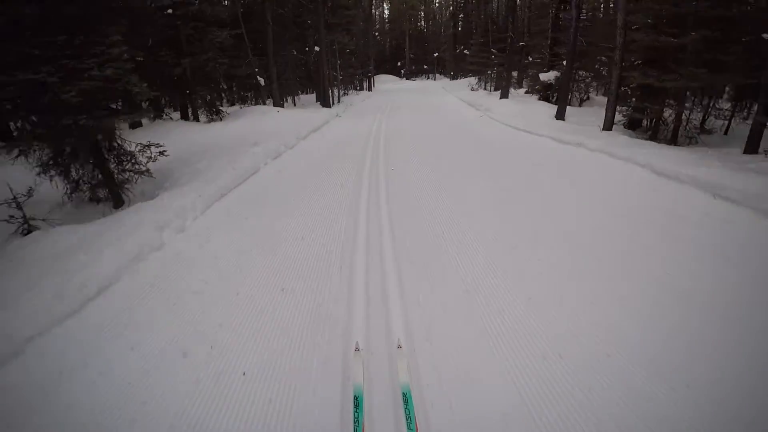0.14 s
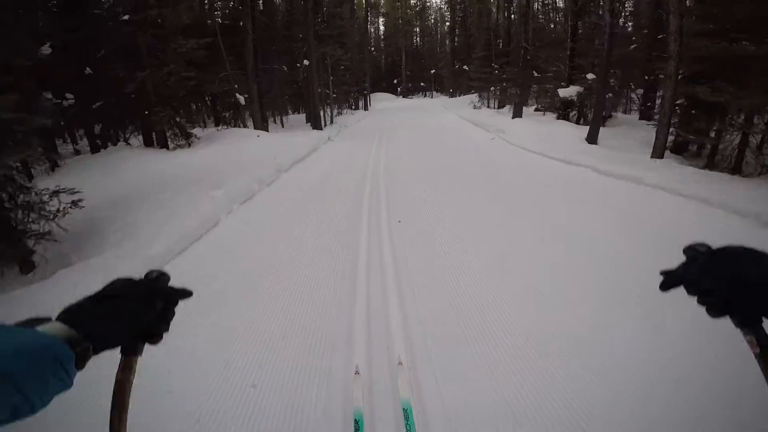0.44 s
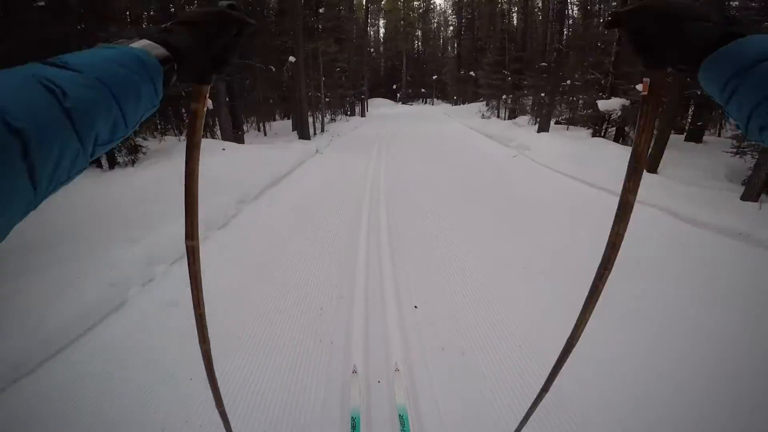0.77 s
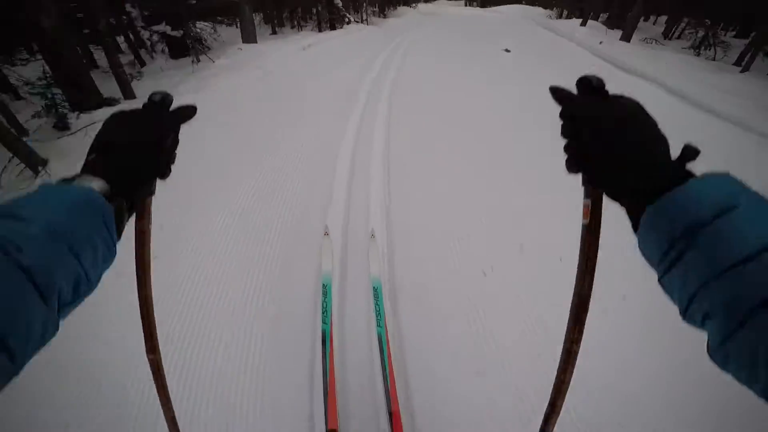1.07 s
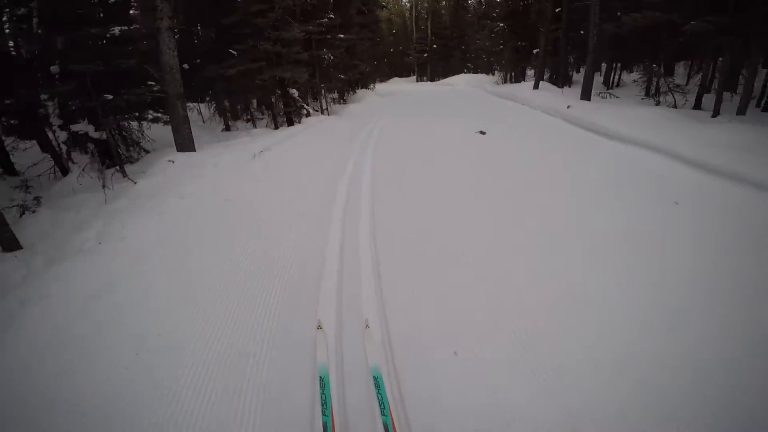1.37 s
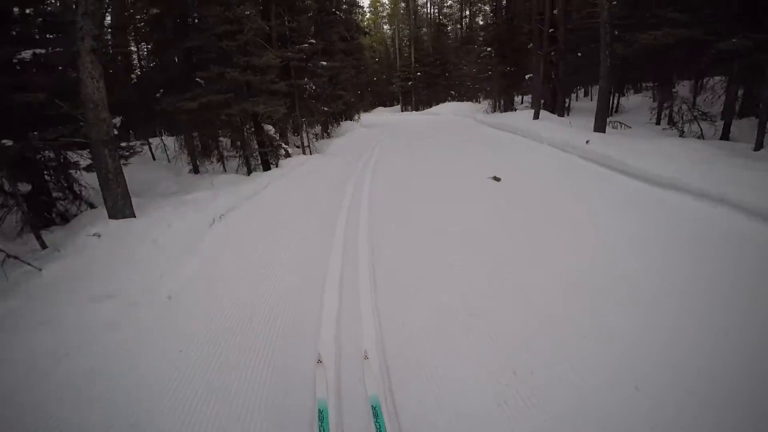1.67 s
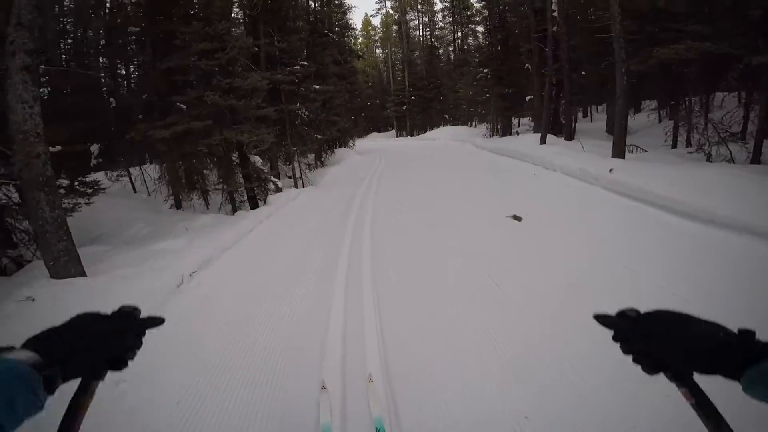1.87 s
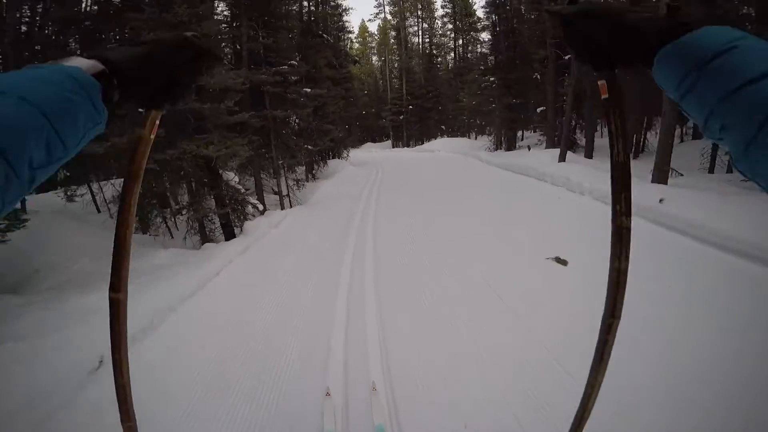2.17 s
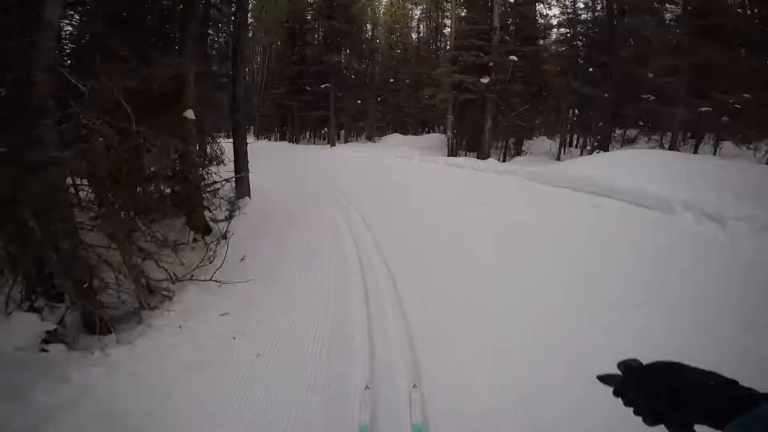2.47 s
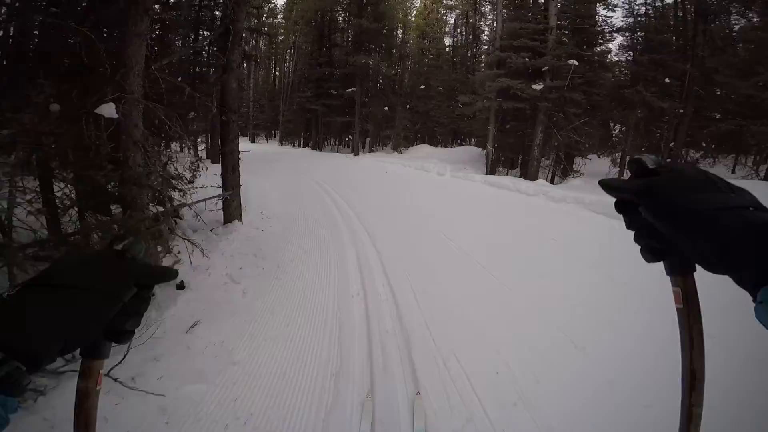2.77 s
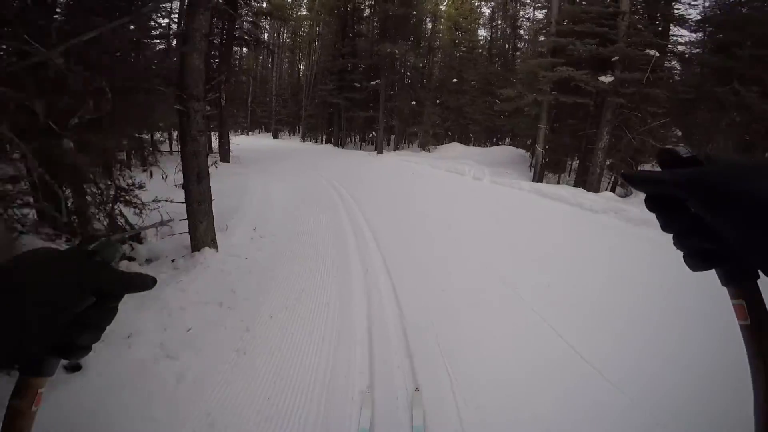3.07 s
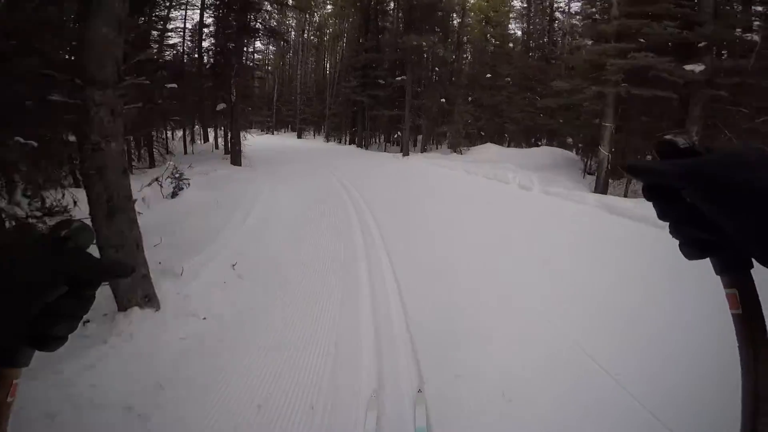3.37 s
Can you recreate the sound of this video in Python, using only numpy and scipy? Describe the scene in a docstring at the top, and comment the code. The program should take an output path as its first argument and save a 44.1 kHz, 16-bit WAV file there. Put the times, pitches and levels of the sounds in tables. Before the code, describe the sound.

Cross-country skis slide with a grainy hiss along a snowy track, under deep, sometimes distorting wind gusts on a chest-worn microphone. Short pole crunches, strap rubbing, knocks and two clicks come through, and the glide is loudest late on.

```python
"""A skier double-poles along a snowy forest track, a small stereo camera strapped to the chest.
From the start the skis hiss over snow grains, the harness rubs the housing and head wind buffets the
two microphone ports, overloading the right. Near 0.85 s a deep swing snaps off; then the poles bite
the crust and the harness knocks. A high sizzle rides the glide from 1.5 to 2.2 s, a second snap comes
near 2.5 s, and after the last bite the ski hiss swells to its loudest around 3 s."""
import sys
import numpy as np
from scipy import signal
from scipy.fft import rfft, irfft
from scipy.io import wavfile
from scipy.ndimage import uniform_filter1d

SR = 44100
rng = np.random.default_rng(int(sys.argv[2]) if len(sys.argv) > 2 else 0)


def transcribe(u):
    """Save the signal u as a 16-bit wav file named by the first command-line argument.

    u: samples, shape (n,) or (channels, n), limited to [-1, 1]; the rate is SR.
    q: integer samples, one column per channel.
    """
    v = np.clip(np.atleast_2d(u).T, -1, 1)
    q = np.round(v * 32767).astype(np.int16)
    wavfile.write(sys.argv[1], SR, q)


N = 155673
WIND_LAG_S = 0.00355  # wind reaches the left port this much later


def from_db(db):
    return 10 ** (np.asarray(db) / 20)


def unit_rms(x):
    return x / np.sqrt(np.mean(x ** 2, axis=-1, keepdims=True) + 1e-20)


def curves(rows, at):
    """One curve per column, interpolated along the first column."""
    axis, *columns = np.transpose(rows)
    return [np.interp(at, axis, column) for column in columns]


def automation(rows):
    """Breakpoints in seconds, drawn out to one value per sample."""
    return curves(rows, np.arange(N) / SR)


def drift(rate_hz):
    """Smooth random wander of unit RMS, rolling off above rate_hz."""
    hop, settle = 40, 2000
    pole = np.exp(-2 * np.pi * hop * rate_hz / SR)
    noise = rng.standard_normal(N // hop + settle + 2)
    slow = signal.lfilter([1], [1, -2 * pole, pole * pole], noise)[settle:]
    return np.interp(np.arange(N) / hop, np.arange(len(slow)), unit_rms(slow))


def ring(x, hz, t60_s):
    """A resonator: each click sets a decaying sine ringing."""
    pole, angle = from_db(-60 / (t60_s * SR)), 2 * np.pi * hz / SR
    return signal.lfilter([0, np.sin(angle)], [1, -2 * pole * np.cos(angle), pole * pole], x + 1e-18)


def band(x, low_hz, high_hz, order=2):
    return signal.sosfilt(signal.butter(order, [low_hz, high_hz], "band", fs=SR, output="sos"), x)


def wind_bed():
    """Head wind on the ports: deep gusts they partly share, plus a lumpy rumble of each port's own."""
    # rumble swells: time_s, left_db, right_db
    rumble_levels = [(0, -49, -50), (.4, -23.5, -16.5), (.9, -31, -23), (1.4, -21, -11), (1.7, -29, -19.5),
                     (2.2, -33, -20.5), (2.5, -21.5, -15), (2.7, -15.5, -48), (2.95, -18, -15.5),
                     (3.1, -20.5, -23), (3.35, -18, -24), (3.53, -21, -16)]
    likeness = 0.21
    noise = rng.standard_normal((4, N + SR))  # the spare second lets the filters settle
    right, left_own = unit_rms(band(noise[:2], 31.3, 49.3, order=1)[:, SR:])
    left = likeness * np.roll(right, int(WIND_LAG_S * SR)) + np.sqrt(1 - likeness ** 2) * left_own
    gusts = from_db(3.93 * drift(1.5)) * [from_db(-27) * left, from_db(-18) * right]
    rumble = [from_db(level_db - drift(13)) * unit_rms(band(port, 54, 145, order=1)[SR:])
              for port, level_db in zip(noise[2:], automation(rumble_levels))]
    return gusts + signal.sosfilt(signal.butter(2, 260, fs=SR, output="sos"), rumble)


def wind_buffets():
    """Each buffet is a few deep pressure swings sliding in pitch, later and mostly weaker on the left."""
    # wind hits: centre_s, length_s, right_db, left_db, swing_hz
    wind_hits = [(0.09, 0.11, -3, -14, 42.3), (0.466, 0.12, -1.5, -16, 39.5), (0.994, 0.025, 0.5, -16, 43),
                 (1.045, 0.068, -2, -6, 30.6), (1.161, 0.11, -2, -17, 34), (1.412, 0.063, -1.5, -20, 70),
                 (1.735, 0.1, -0.5, -13, 44), (2.102, 0.099, -5, -20, 41.6), (2.369, 0.049, 0.5, -23, 47.6),
                 (2.423, 0.073, -0.5, -11, 30.2), (2.506, 0.069, 1.5, -24, 40.2),
                 (2.63, 0.18, -33, -13.5, 33.7), (2.859, 0.051, 2, -7, 35.6), (2.929, 0.055, -4, -5.5, 40),
                 (3.249, 0.069, 0.5, -11, 40.7)]
    out, t = np.zeros((2, N)), np.arange(N) / SR
    for centre_s, length_s, right_db, left_db, swing_hz in wind_hits:
        phase, slide = rng.uniform(-0.76, 1, 2)
        span = slice(max(int((centre_s - length_s) * SR), 0), int((centre_s + length_s) * SR))
        offset_s = t[span] - centre_s - [[WIND_LAG_S], [0]]
        swell = np.exp(-(2.68 * offset_s / length_s) ** 2)
        cycles = swing_hz * offset_s * (1 + 7.3 * slide * offset_s)
        swing = np.cos(2 * np.pi * cycles + np.pi * phase + [[-1.1], [0]])
        out[:, span] += from_db([[left_db], [right_db]]) * swell * swing
    ragged_db = 1.8 * np.array([drift(15), drift(32)])
    return out * from_db(1 + ragged_db)


def harness_on_housing():
    """Lumpy harness friction and bouncing knocks ring the same modes of the camera housing."""
    # harness rub: time_s, level_db, upper_modes_db
    rub_levels = [(0, -32.5, -9), (.3, -21, -17.5), (.47, -27, -33), (.52, -15.5, -13.5), (.66, -13, -2),
                  (.79, -10.5, -11), (.84, -27, -1.5), (1.05, -18.5, -8.5), (1.18, -11.5, -9),
                  (1.4, -13.5, -9), (1.46, -27, -8), (1.68, -24, -20.5), (1.95, -18.5, -16),
                  (2.02, -16, -10), (2.19, -10.5, -18.5), (2.26, -42, -12), (2.36, -12.5, -6.5),
                  (2.45, -16.5, -7.5), (2.55, -73, -5), (3.53, -47, -1.5)]
    # housing modes: pitch_hz, t60_s, left_db, right_db, left_sign, knock_share_db
    housing_modes = [(73.1, 0.37, -22, -3, -1, 5), (120.8, 0.35, -9.5, 1, -1, 2.5),
                     (138.7, 0.3, -11.5, 1.5, -1, -9), (319, 0.086, -19.5, -7.5, 1, 9),
                     (541, 0.069, -28, -19, -1, 8), (637, 0.12, -13, -12, -1, 12.5),
                     (1054, 0.035, -24, -25.5, -1, 25.5), (1742, 0.081, -36, -26, -1, 26),
                     (2265, 0.014, -27.5, -53, 1, 30.5)]
    # harness knocks: start_s, strength_db, tilt_db_per_octave
    harness_knocks = [(1.174, -4, 1), (1.24, -5, 1), (1.341, -4.5, 0.5), (2.033, -4.5, 3),
                      (2.785, -12, -0.5), (2.966, -8, 1)]
    gain_db, bounce_s, bounce_db, knock_decay_ratio = 2.5, 0.0024, -3.5, 0.3
    rub_db, upper_db = automation(rub_levels)
    rub_db = rub_db + 3 * drift(8.1)
    soften = signal.butter(1, 1300, fs=SR, output="sos")
    start_s, knock_db, tilt_db = np.transpose(harness_knocks)
    out = np.zeros((2, N))
    for hz, t60_s, left_db, right_db, left_sign, share_db in housing_modes:
        strength = from_db(knock_db + share_db + tilt_db * np.log2(hz / 640))
        clicks = np.zeros(N)
        clicks[(start_s * SR).astype(int)] = strength
        clicks[((start_s + bounce_s) * SR).astype(int)] = -strength * from_db(bounce_db)
        knocked = ring(signal.sosfilt(soften, clicks), hz, t60_s * knock_decay_ratio)
        rubbed = unit_rms(ring(rng.standard_normal(N), hz, t60_s))
        rubbed /= np.sqrt(uniform_filter1d(rubbed ** 2, size=4000) + 0.29)  # tame chance swells
        rubbed *= from_db(rub_db + (hz > 200) * (upper_db - upper_db.mean()))
        out += (rubbed + knocked) * [[np.sign(left_sign) * from_db(left_db)], [from_db(right_db)]]
    return out * from_db(gain_db)


def pole_bites():
    """Pole tips and ski edges break the crust: a short pitched noise burst over a broad spit."""
    # crust crunches: start_s, level_db, centre_hz, length_s
    crunches = [(0.926, -16.5, 2550, 0.012), (1.157, -17, 4600, 0.015), (1.201, -23, 4650, 0.032),
                (1.32, -21, 2860, 0.045), (1.404, -24.5, 3340, 0.025), (1.560, -24.5, 3320, 0.075),
                (1.674, -22, 610, 0.018), (2.336, -31, 2940, 0.012), (2.604, -15.5, 740, 0.0055),
                (2.788, -12.5, 1040, 0.0094)]
    attack_s, spit_db = 0.001, -6
    out, t = np.zeros((2, N)), np.arange(4000) / SR
    for start_s, level_db, centre_hz, length_s in crunches:
        shared, left, right = rng.standard_normal((3, len(t)))
        noise = unit_rms(np.array([shared + 0.45 * left, shared + 0.18 * right]))
        width_octaves = 0.3 * np.sqrt(4000 / centre_hz)
        edge_ratio = 2 ** (width_octaves / 2)
        crunch = unit_rms(band(noise, centre_hz / edge_ratio, centre_hz * edge_ratio))
        spit = from_db(spit_db) * band(noise, 460, 8700)
        envelope = np.minimum(t / attack_s, 1) * np.exp(-(t / length_s) ** 2)
        start = int(start_s * SR)
        out[:, start:start + len(t)] += from_db(level_db) * (crunch + spit) * envelope
    return out * from_db([[-1.5], [0.5]])  # a little to the right


def snow_spectrum(hz):
    """Stereo spectrum of crushed snow: grain ticks in smooth hiss, coloured for each port."""
    # tone of the snow hiss: frequency_hz, left_db, right_db
    snow_colour = [(523, 10, 9.5), (800, -6, -1.5), (1180, -3, 3.5), (1510, -5.5, 1.5), (1750, -2.5, 4),
                   (2200, -4.5, -9), (2670, 1, 0), (3530, -1, 1.5), (4520, -7, -8.5), (5220, -2, 0),
                   (7240, 1, -1.5), (8020, 1, 6), (7960, -2.5, -1), (8970, -1, 2.5), (10960, -10, -6.5),
                   (11400, -16, -6.5), (12900, -12, -11.5), (15400, -24, -19)]
    # how the ports share the hiss: frequency_hz, likeness (0-1), right_lead_rad
    stereo_image = [(800, .5, -3.0), (1150, .5, -.4), (1450, .4, .7), (1750, .75, 3.8), (2500, .85, 6.3),
                    (3200, .8, 7.1), (4400, .3, 6.6), (5200, .75, 6.4), (7400, .4, 5.1), (8800, .4, 3.4),
                    (11300, .3, 5.6), (15000, .15, 6.0)]
    grains_per_s, grain_share = 3000, 0.24
    grains = (rng.random((3, N)) < grains_per_s / SR) * rng.choice([-1, 1], (3, N))
    grains = unit_rms(grains * from_db(5 * np.minimum(rng.exponential(1, (3, N)), 5)))
    smooth = rng.standard_normal((3, N))
    shared, left, right = rfft(np.sqrt(grain_share) * grains + np.sqrt(1 - grain_share) * smooth)
    left_db, right_db = curves(snow_colour, hz)
    likeness, lead_rad = curves(stereo_image, hz)
    left = np.sqrt(likeness) * shared + np.sqrt(1 - likeness) * left
    right = np.sqrt(likeness) * shared * np.exp(1j * lead_rad) + np.sqrt(1 - likeness) * right
    return from_db([left_db, right_db]) * [left, right]


def ski_glide():
    """Skis slide over patchy snow: bands of hiss follow the glide and flutter, together and apart."""
    # skis on snow: time_s, level_db, crunch_db (near 3 kHz), scrape_db (near 1 kHz)
    glide_levels = [(0.0, -34, -1, -4), (0.13, -29.5, -4, -5), (0.63, -24, -4, -3.5),
                    (0.842, -26.5, -5, -8), (0.848, -32.5, -7, -1), (0.918, -33.5, 1, -14),
                    (0.924, -29.5, 4.5, 3), (0.98, -25, 4.5, -2.5), (1.02, -31.5, -1.5, -3),
                    (1.146, -25.5, -2, -11), (1.153, -21.5, 2, -3), (1.18, -34, -7, 2),
                    (1.21, -21, -3.5, -2), (1.24, -32, -6, 3), (1.29, -22, 0, -2.5), (1.51, -28, -3, -6.5),
                    (1.58, -22, -2.5, -1), (1.73, -28, 0.5, -4), (1.86, -21.5, -0.5, -4.5),
                    (1.9, -28, -3, -4), (2.02, -19.5, -3, -5), (2.055, -23.5, -3, -3),
                    (2.085, -20, -3, -4.5), (2.332, -27.5, -2, -3.5), (2.337, -24, 8, 1.5),
                    (2.43, -24, 2.5, -7.5), (2.44, -26.5, -3, -4), (2.74, -24.5, -3.5, -7.5),
                    (2.79, -15.5, 0, 0.5), (2.82, -16.5, -1, -4.5), (2.87, -20.5, -1, -4.5),
                    (2.94, -14, -3, -9.5), (2.958, -23, -6, -3), (2.97, -11, -2.5, -8),
                    (2.99, -24, -2.5, -10), (3.028, -23, -5, -7), (3.034, -15.5, -2.5, -8.5),
                    (3.15, -13, -2.5, -9.5), (3.31, -25, -2.5, -7), (3.49, -16.5, -4.5, -7),
                    (3.53, -14, -4.5, -9)]
    # narrow sizzle on top of the hiss: time_s, level_db
    sizzle_levels = [(0, -21), (1.2, -15.5), (1.5, 1.5), (2.2, -1), (2.6, -14.5), (3.53, -18)]
    sizzle_hz, sizzle_width_hz, top_follow = 7080, 420, 0.91
    centres_hz = [250, 700, 1500, 2700, 3600, 5200, 7300, 9500, 13000]  # the lowest band stays silent
    hz = np.fft.rfftfreq(N, 1 / SR)
    hiss = snow_spectrum(hz)
    layers = [irfft(hiss * np.interp(hz, centres_hz, weights), N) for weights in np.eye(9)[1:]]
    layers.append(irfft(hiss * np.exp(-((hz - sizzle_hz) / sizzle_width_hz) ** 2), N))
    treble_rms = np.sqrt(np.mean(sum(layers[4:7]) ** 2))
    level_db, crunch_db, scrape_db = automation(glide_levels)
    crunch_db -= crunch_db.mean()
    scrape_db -= scrape_db.mean()
    top_db = (top_follow - 1) * (level_db - level_db.mean())  # the top swings a little less
    patches_db = drift(2.5) + 1.15 * drift(43)
    sizzle_db = automation(sizzle_levels)[0] + 3 * drift(3.1)
    trims_db = [scrape_db, scrape_db, crunch_db, crunch_db, 0, 0, top_db, top_db, sizzle_db]
    return sum(layer * from_db(level_db + trim_db + patches_db + 1.5 * drift(6))
               for layer, trim_db in zip(layers, trims_db)) / treble_rms


def snaps(mix):
    """A deep swing takes over the bass, then all sound cuts with a dry click and fades straight back."""
    # cut-off swings: cut_s, right_height (signed)
    cut_swings = [(0.8452, -.85), (2.465, .85)]
    rise_s, return_s, left_share = 0.006, 0.006, 0.3
    t = np.arange(N) / SR
    for cut_s, height in cut_swings:
        swing = np.where(t < cut_s, np.exp(-((t - cut_s) / rise_s + 0.5) ** 2), 0)
        gate = np.where(t < cut_s, 1, 1 - np.exp(-np.maximum(t - cut_s, 0) / return_s))
        bass = uniform_filter1d(mix, size=150)
        mix = mix * gate + swing * (height * np.array([[left_share], [1]]) - bass)
    return mix


def scene():
    """Skis, poles, harness and wind at the two ports, broken by two snaps."""
    return snaps(ski_glide() + pole_bites() + harness_on_housing() + wind_bed() + wind_buffets())


def record(dry):
    """The input overloads with flat tops at full scale, then the highest treble is cut."""
    hardness, stop_hz = 12, 15700
    clipped = dry / (1 + np.abs(dry) ** hardness) ** (1 / hardness)
    return signal.sosfilt(signal.cheby2(16, 70, stop_hz, fs=SR, output="sos"), clipped)


dry = scene()
out = record(dry)
transcribe(out)
```